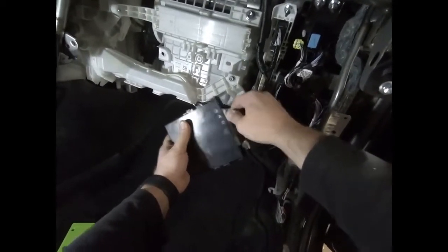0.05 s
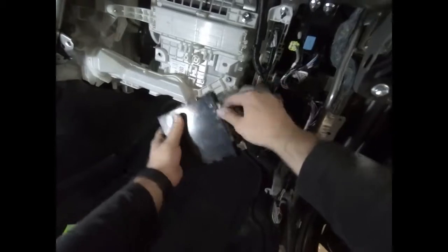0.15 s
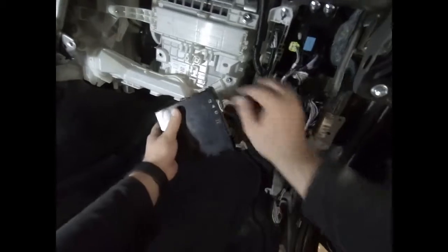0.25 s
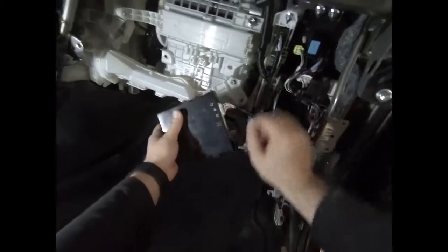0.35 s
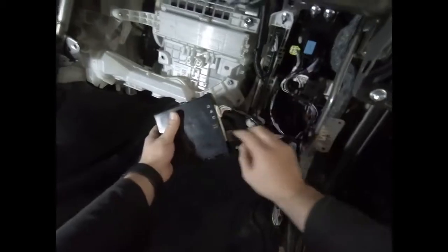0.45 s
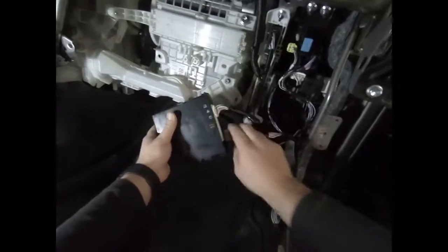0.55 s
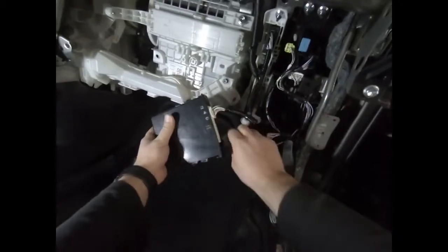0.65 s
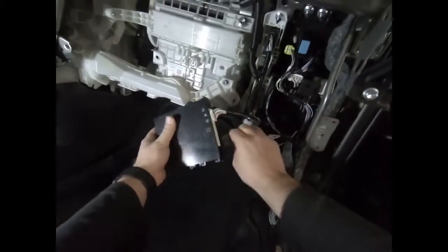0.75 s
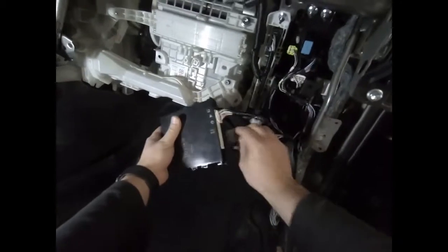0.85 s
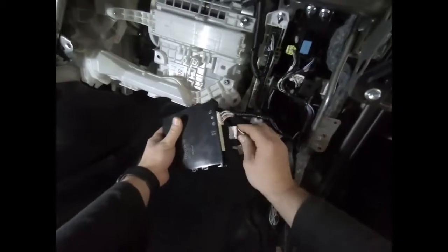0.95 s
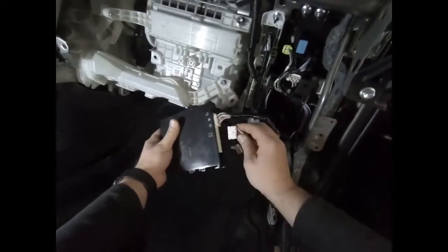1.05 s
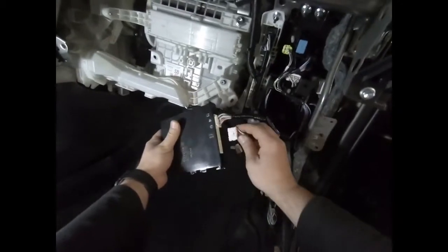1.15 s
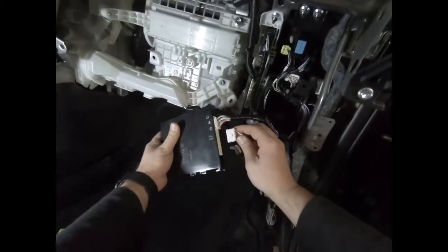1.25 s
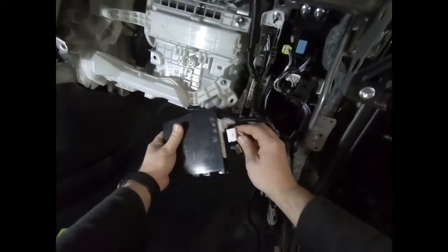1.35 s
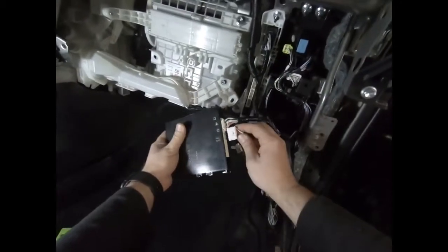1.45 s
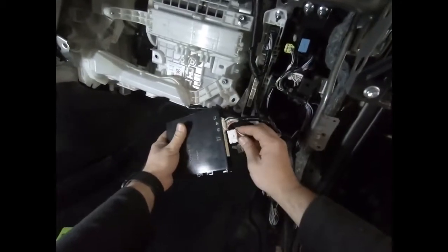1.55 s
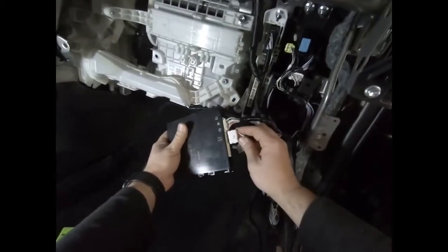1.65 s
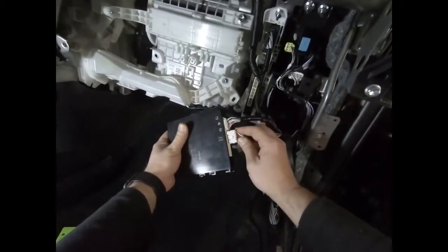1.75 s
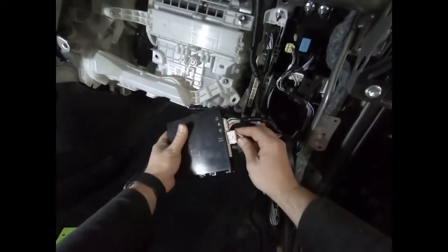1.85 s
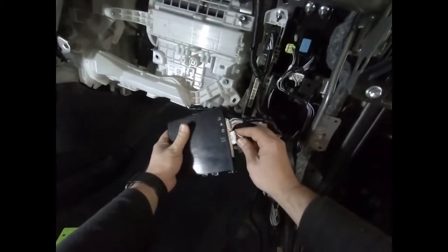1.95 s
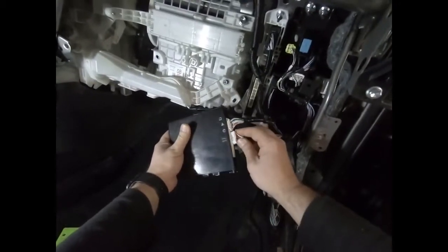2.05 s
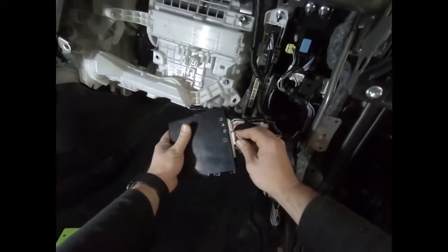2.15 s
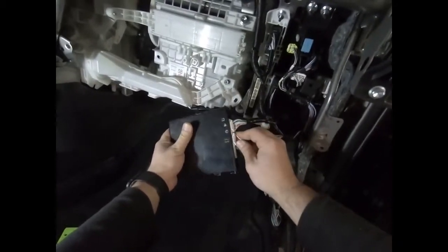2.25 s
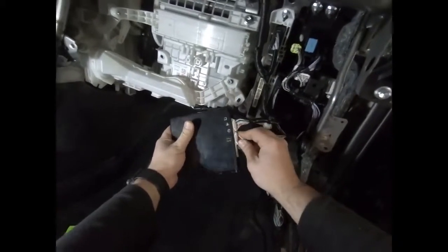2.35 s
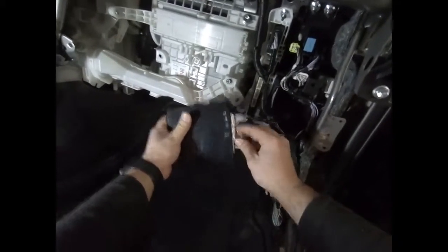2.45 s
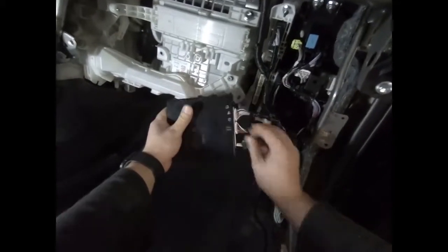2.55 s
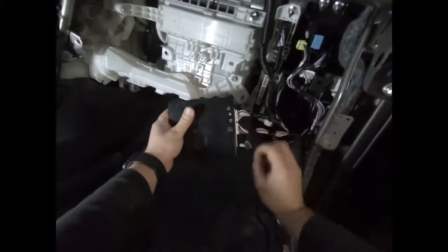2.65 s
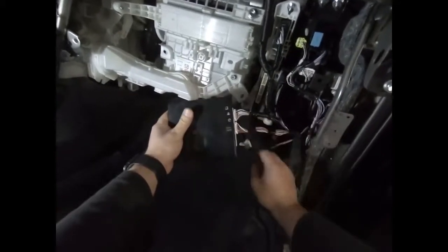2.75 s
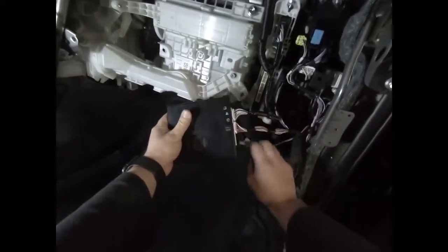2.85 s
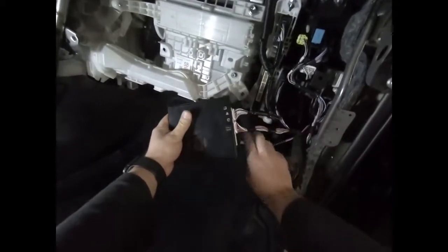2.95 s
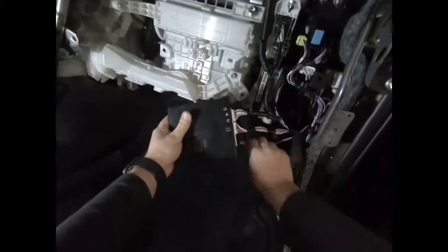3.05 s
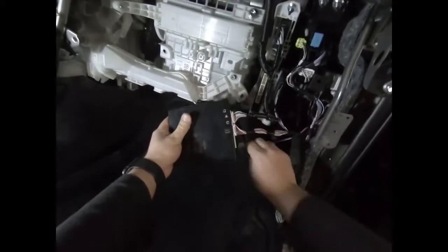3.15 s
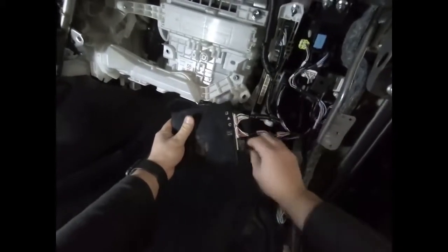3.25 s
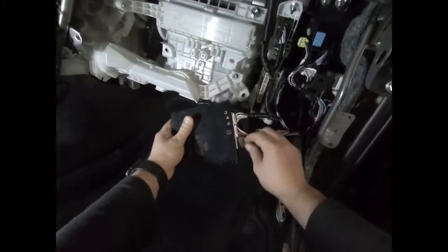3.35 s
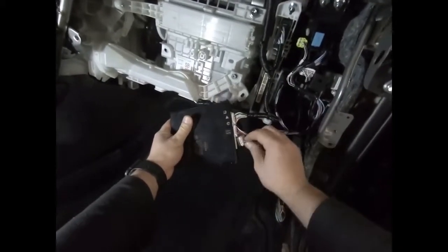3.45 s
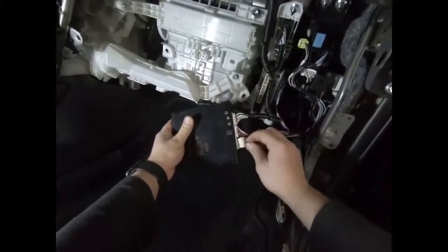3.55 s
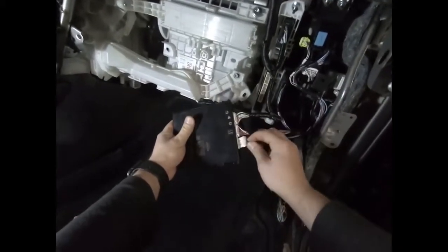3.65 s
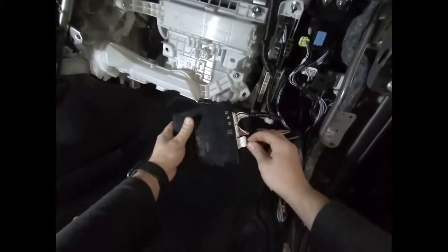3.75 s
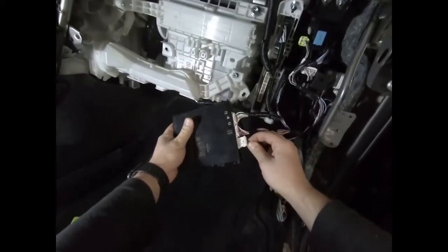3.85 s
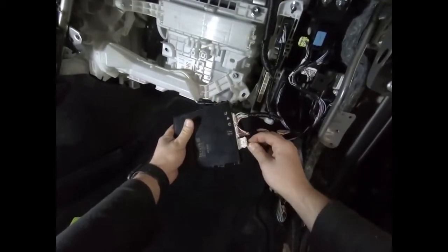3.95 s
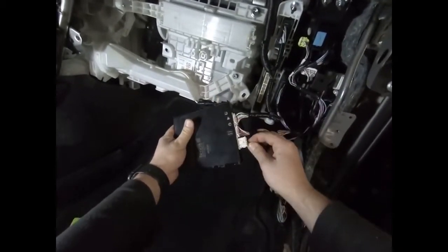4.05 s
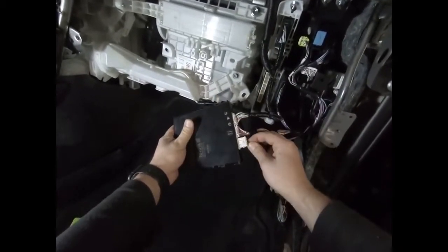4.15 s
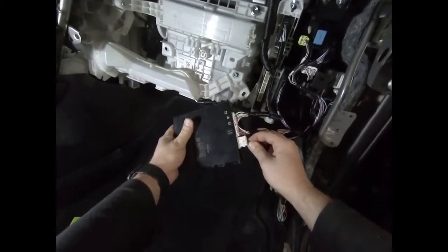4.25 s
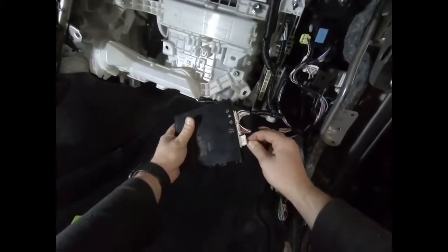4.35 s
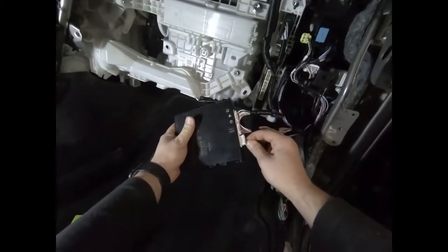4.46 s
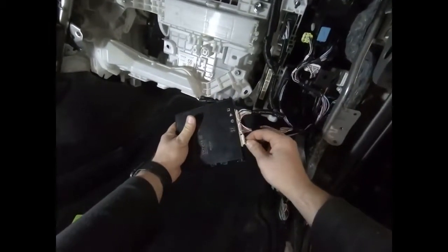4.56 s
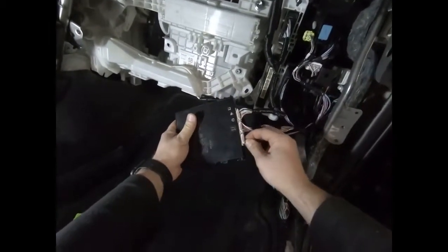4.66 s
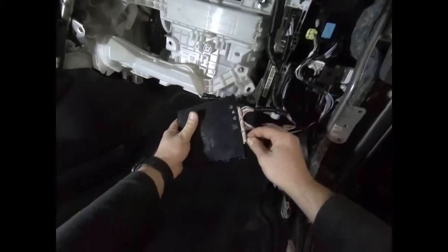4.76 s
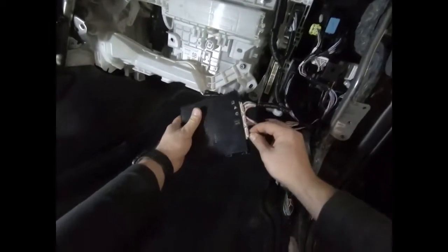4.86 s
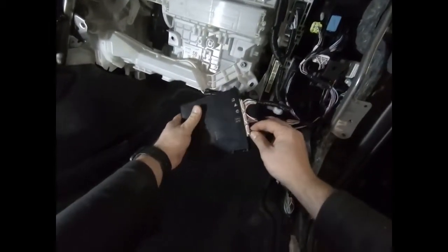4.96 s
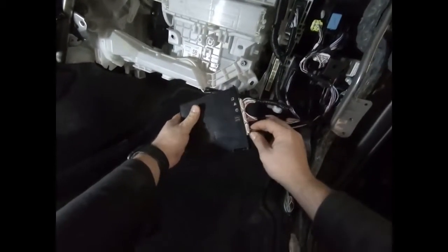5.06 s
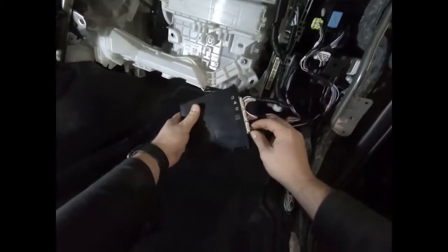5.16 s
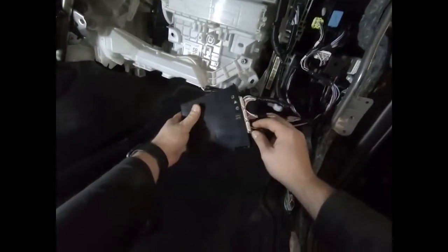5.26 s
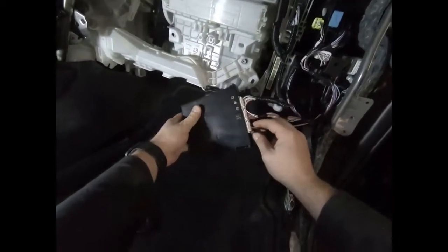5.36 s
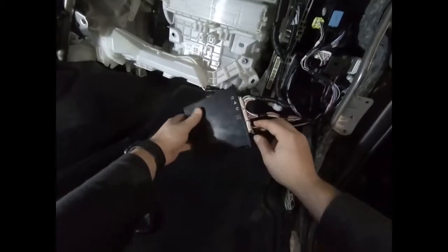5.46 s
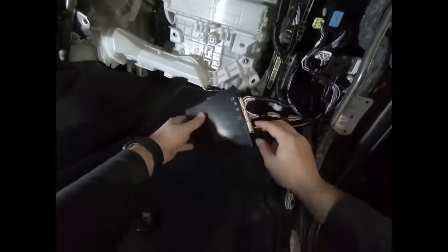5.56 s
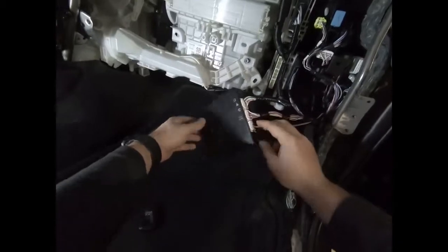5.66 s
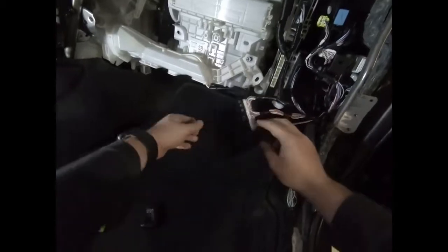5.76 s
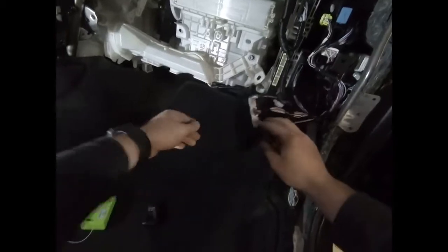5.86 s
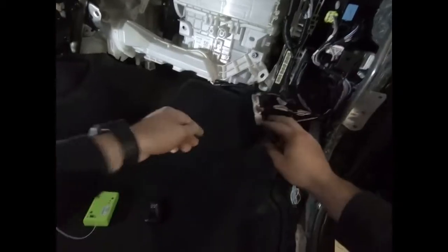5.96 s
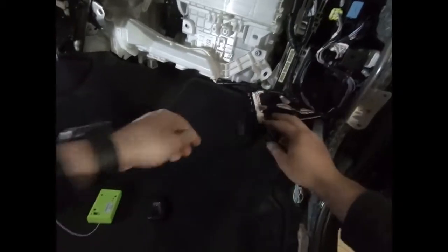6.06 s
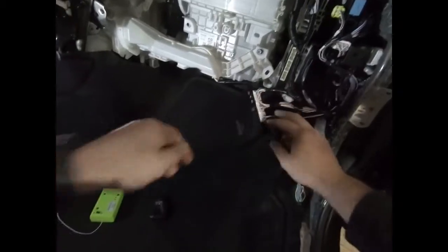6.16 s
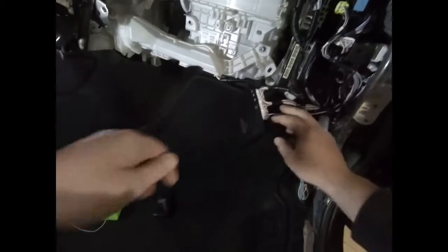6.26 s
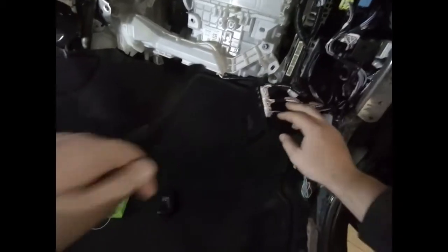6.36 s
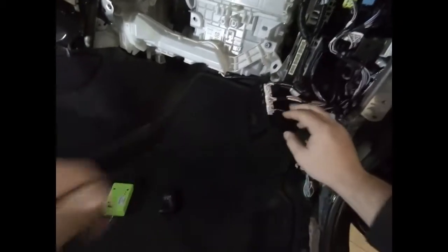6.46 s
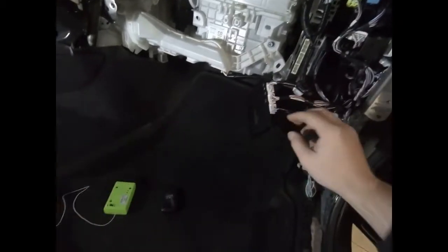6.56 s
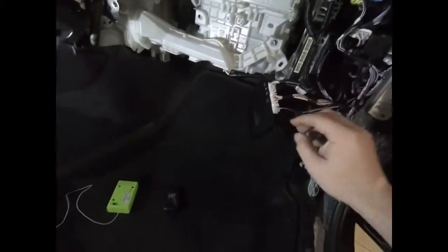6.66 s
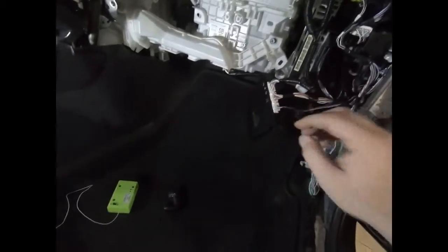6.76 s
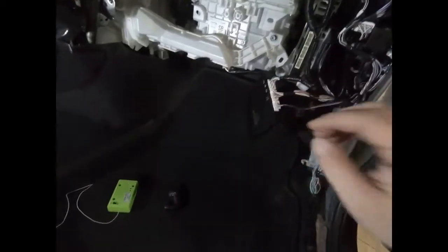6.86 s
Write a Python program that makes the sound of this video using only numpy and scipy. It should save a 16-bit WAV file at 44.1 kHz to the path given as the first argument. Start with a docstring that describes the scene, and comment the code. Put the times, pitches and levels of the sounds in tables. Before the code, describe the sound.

Right at the start a sharp plastic snap, the loudest sound, marks a wiring plug latching into a control unit under a car dashboard. Light ticks and scuffs follow, with a small click near 0.8 seconds and another around 2 seconds. A second sharp snap comes at about 2.4 seconds, then soft scuffing and rubbing of fingers and wires until nearly 3 seconds, and again around 3.5. Small ticks cluster from 4.1 to 4.4 seconds, leading to a clear, lighter snap at 4.7. From about 5.5 seconds a sleeve drags close by in several soft pulls, with dull bumps of the microphone mount from 6 seconds and one last small tick near 6.8. Each click rings only briefly in the tight hollow. The body-worn microphone hears everything close and almost in mono, over a faint low workshop hum and slight hiss.

```python
"""Under a stripped car dashboard in a quiet workshop, hands push small plastic plugs into a control unit.
Each snap or tick rings the latch, the plug's shell and the unit's case, and the hollow answers briefly.
Plugs scuff, fingers and wires rub, and at the end a sleeve drags close by. A body-worn microphone hears
it almost in mono, with soft bumps of its mount, over the workshop's hum and its own hiss."""
import sys
import numpy as np
from scipy import signal
from scipy.fft import rfft, irfft, next_fast_len
from scipy.io import wavfile
from scipy.ndimage import map_coordinates

SR = 44100
rng = np.random.default_rng(int(sys.argv[2]) if len(sys.argv) > 2 else 0)


def wav_record(signal):
    """Record a signal, one row per channel, as 16-bit PCM in the file named by sys.argv[1]."""
    frames = np.transpose(np.atleast_2d(signal))
    bounded = np.clip(frames, -1, 1)
    # unit amplitude maps onto the largest positive 16-bit level
    quanta = np.round(bounded * 32767).astype(np.int16)
    wavfile.write(sys.argv[1], SR, quanta)


N = 304171


def amp(db):
    """Decibels to gain."""
    return 10 ** (np.asarray(db) / 20)


def unit(x):
    """Scaled to rms 1."""
    return x / np.sqrt(np.mean(x ** 2) + 1e-20)


def along(points, hz):
    """Reads (Hz, value) points on a log frequency axis."""
    freqs, values = np.transpose(points)
    return np.interp(np.log(hz + 1), np.log(freqs + 1), values)


def curves(rows):
    """A fader curve for each column after the time, held at both ends."""
    times, *columns = np.transpose(rows)
    return [np.interp(np.arange(N) / SR, times, column) for column in columns]


def filtered(x, response):
    """x through a complex response of frequency."""
    size = next_fast_len(x.shape[-1] + 8192)
    return irfft(rfft(x, size) * response(np.fft.rfftfreq(size, 1 / SR)), size)[..., :x.shape[-1]]


def resonances(modes):
    """Response of (Hz, width Hz, dB) modes, summed with alternating polarity."""
    return lambda f: sum((-1) ** k * amp(db) * 1j * f * width / (hz * hz - f * f + 1j * f * width)
                         for k, (hz, width, db) in enumerate(modes))


def colour(points):
    """Response of an EQ curve through (Hz, dB) points."""
    return lambda f: amp(along(points, f))


def uneven_noise(response, flutter_db, rate_hz):
    """Coloured noise of rms 1 whose level wavers smoothly at random."""
    noise = rng.standard_normal(N)
    knots = rng.standard_normal(int(N * rate_hz / SR) + 4)
    flutter = map_coordinates(knots, [np.arange(N) * rate_hz / SR])
    return unit(filtered(noise * amp(flutter_db * flutter), response))


# The room tone's colour. Each row: frequency in Hz, relative level in dB.
HUM_EQ = [(12, -30), (20, 2.5), (43, 0.5), (111, -16.5), (136, -10), (190, -5), (251, -14.5), (408, -17.5),
          (527, -34), (716, -12), (794, -19), (1620, -23.5), (2380, -42.5), (4290, -41), (9000, -42),
          (11700, -67.5), (19800, -120)]


def workshop():
    """A low hum of air, gently wavering."""
    return amp(-71) * uneven_noise(colour(HUM_EQ), flutter_db=-2, rate_hz=3.4)


# Low thuds. Each row: start in seconds, level in dB, pitch in Hz, seconds to fall 60 dB.
BUMPS = [(0.098, -49, 61.6, 0.13), (0.955, -50.5, 78.6, 0.082), (2.698, -72, 126, 0.19),
         (3.479, -53, 85, 0.14), (5.962, -43, 149, 0.087), (6.244, -44.5, 114, 0.088),
         (6.731, -46, 84.6, 0.38)]


def mount_bumps():
    """The microphone's mount is bumped: each thud is a damped sine with a soft attack."""
    out, t = np.zeros(N + SR), np.arange(SR // 2) / SR
    attack = 1 - np.exp(-t / 0.0034)
    for start, db, hz, t60 in BUMPS:
        out[round(start * SR):][:len(t)] += amp(db - 60 * t / t60) * attack * np.sin(2 * np.pi * hz * t)
    return out[:N]


# The weave's hiss, standing for cloth speed. Each row: time in seconds, level in dB.
WEAVE_LEVELS = [(5.4, -98.5), (5.75, -80), (5.9, -79), (6.04, -71), (6.79, -68.5), (6.897, -74)]
# Pulls of the sleeve. Each row: start in seconds, length in seconds, drag level in dB.
SLEEVE_PULLS = [(5.454, 0.2, -65), (5.68, 0.14, -56.5), (5.88, .14, -58.5), (6.114, 0.14, -59.5),
                (6.361, 0.128, -58), (6.516, 0.18, -54.5), (6.704, 0.22, -54.5)]
# Colours of the low drag, mid creases and bright weave. Each row: frequency in Hz, relative level in dB.
DRAG_EQ = [(29, -34), (50, -4), (119, -9), (157, 2), (243, -3.5), (414, -0.5), (668, -11.5), (1200, -22.5),
           (1560, -42), (2640, -120)]
CREASE_EQ = [(470, -33.5), (800, -5), (860, -7), (1790, -5), (3000, -21.5), (3900, -52.5), (6600, -120)]
WEAVE_EQ = [(1880, -35), (3200, -14), (4040, -1.5), (4610, -1), (5970, -10.5), (7000, -23), (8160, -15.5),
            (10900, -33), (12600, -24.5), (15600, -29.5)]


def sleeve(rise_s=0.022, fall_s=0.04, slack_db=-8):
    """Cloth drags in a low scuff with each pull, creases crackle, the weave hisses smoothly."""
    t = np.arange(N) / SR

    def swell(start, length):
        return np.clip(np.minimum((t - start) / rise_s, 1 + (start + length - t) / fall_s), 0, 1)

    drag = np.zeros(N)
    for start, length, db in SLEEVE_PULLS:
        slack = amp(slack_db) * swell(start, length + 0.1)  # the cloth drags on a little after a pull
        drag = np.maximum(drag, amp(db) * np.maximum(swell(start, length), slack))
    hiss = amp(curves(WEAVE_LEVELS)[0]) * (t > WEAVE_LEVELS[0][0])
    crackle = np.hypot(amp(-10.5) * drag, amp(6) * hiss)
    return (drag * uneven_noise(colour(DRAG_EQ), flutter_db=2.5, rate_hz=60)
            + crackle * uneven_noise(colour(CREASE_EQ), flutter_db=2, rate_hz=140)
            + hiss * uneven_noise(colour(WEAVE_EQ), flutter_db=0.4, rate_hz=31))


# Modes of the unit's case and the plug's shell. Each row: pitch in Hz, width in Hz, relative level in dB.
CASE_MODES = [(170, 42, 2.5), (310, 230, -10)]
SHELL_MODES = [(380, 80, -5), (520, 230, -0.5), (818.5, 92, 5.5), (953, 160, -3), (1393, 310, -1.5),
               (1640, 110, 1), (1820, 520, -5), (2077, 120, -3.5)]
# Fingers and wires rubbing. Each row: time in seconds, pressing level in dB, sliding level in dB.
RUB_LEVELS = [(0.07, -66, -72.5), (0.56, -68.5, -72), (0.8, -72.5, -77), (1.9, -74, -77),
              (2.27, -67.5, -74), (2.8, -60, -72), (3.17, -76.5, -80.5), (3.41, -76, -77.5),
              (3.61, -77, -70), (3.88, -77, -81), (4.6, -75, -75), (4.84, -66.5, -76.5), (5.16, -81.5, -80)]


def fingers():
    """Pressing stirs the case, sliding the shell, over a faint, nearly steady hiss around 4.3 kHz."""
    press_db, slide_db = curves(RUB_LEVELS)
    hiss_band_db = -85.5 + 0.4 * (slide_db - slide_db.mean())
    # skin is too soft to drive the shell's treble
    dull_shell = lambda f: resonances(SHELL_MODES)(f) / (1 + (f / 2300) ** 4)
    hiss_band = lambda f: resonances([(4300, 1500, 0)])(f) ** 3
    return (amp(press_db) * uneven_noise(resonances(CASE_MODES), flutter_db=1.5, rate_hz=27)
            + amp(slide_db) * uneven_noise(dull_shell, flutter_db=2.4, rate_hz=24)
            + amp(hiss_band_db) * uneven_noise(hiss_band, flutter_db=0.34, rate_hz=29))


# The dashboard hollow's decay. Each row: frequency in Hz, seconds to fall 60 dB.
HOLLOW_DECAY = [(200, .2), (1000, 0.18), (5000, 0.13), (12000, 0.12)]


def hollow(x, wet_db=-9.5):
    """x plus a fresh short tail from the dashboard hollow, the treble dying first."""
    hz, t, spectra = signal.stft(rng.standard_normal(len(x)), SR, nperseg=128)
    decay = amp(-60 * t / along(HOLLOW_DECAY, hz)[:, None])
    tail = signal.istft(spectra * decay, SR, nperseg=128)[1]
    return x + amp(wet_db) * signal.fftconvolve(x, tail / np.linalg.norm(tail))[:len(x)]


def contact(start, decay_ms, parts, swell_db):
    """One rough push rings each (response, peak dB) part, and the hollow answers."""
    lead = SR // 20
    t = (np.arange(SR // 3) - lead) / SR
    age = np.maximum(t, 0) * 1000 / decay_ms
    pushes = np.tile(np.minimum(3 * age, 1) * np.exp(-age), (len(parts), 1))
    pushes[0] += amp(swell_db + 1800 * np.minimum(t, 0)) * (t < 0)  # the first part swells in early
    grit = amp(rng.normal(0, 2.5, len(t) // 64 + 1)).repeat(64)[:len(t)]  # surfaces catch and slip
    sound = np.zeros(len(t))
    for push, (response, peak_db) in zip(pushes, parts):
        ring = filtered(push * grit * rng.standard_normal(len(t)), response)
        sound += amp(peak_db) * ring / np.abs(signal.hilbert(ring)).max()
    return np.pad(hollow(sound), (round(start * SR), N))[lead:lead + N]


def struck(modes, pitch_hz, db_per_octave, band_hz):
    """Modes near the struck spot's pitch lead; the part radiates through one (centre, width) band."""
    weighted = [(hz, width, db - db_per_octave * abs(np.log2(hz / pitch_hz))) for hz, width, db in modes]
    return lambda f: resonances(weighted)(f) * resonances([(*band_hz, 0)])(f) ** 2


# The cracks' bright colour. Each row: frequency in Hz, relative level in dB.
CRACK_EQ = [(1500, -40.5), (2100, -8), (3200, -9.5), (5500, -19), (7000, -6.5), (8300, -2), (11200, -15.5),
            (12600, -5.5), (15600, -9)]
# Edges meeting. Each row: start in seconds, peak level in dB, decay in milliseconds.
EDGE_HITS = [(0.0175, -37.5, 3), (0.675, -60, 5.6), (0.6974, -61, 6), (0.846, -64.5, 4.8), (1.429, -63, 9),
             (2.2014, -67.5, 6), (2.3585, -39.5, 5), (4.6922, -48, 6)]


def edge_cracks():
    """Hard edges meet with a short, broad crack in the air."""
    return sum(contact(start, ms, [(colour(CRACK_EQ), db)], swell_db=-39.5)
               for start, db, ms in EDGE_HITS)


# The latch's modes. Each row: pitch in Hz, width in Hz, relative level in dB.
LATCH_MODES = [(4090, 410, 2.5), (4420, 67, -5), (4484, 200, -2), (5080, 250, -4.5), (5514, 180, -2),
               (5977, 150, -5.5), (6200, 300, -10.5)]


def latch(db):
    """Response of the plastic latch: a harder snap rings it higher."""
    pitch_hz = np.interp(db, [-60, -38.5], [4870, 5300])
    return struck(LATCH_MODES, pitch_hz, db_per_octave=31.5, band_hz=(4900, 2400))


def latch_chatter(start_s=4.107, gap_s=0.025, peak_db=-56):
    """The latch drags twice over its ramp."""
    return sum(contact(start, decay_ms=14, parts=[(latch(peak_db), peak_db)], swell_db=-16.5)
               for start in (start_s, start_s + gap_s))


# Plug scuffing on case. Each row: start in seconds, shell peak in dB, shell pitch in Hz.
PLUG_SCUFFS = [(0.207, -55.5, 718), (0.351, -53, 401), (0.516, -56.5, 407), (0.537, -58, 423),
               (1.091, -60, 794), (1.549, -60.5, 840), (2.651, -52.5, 860), (2.775, -57.5, 1640),
               (2.838, -58.5, 1800), (2.793, -54.5, 462), (2.82, -58, 401), (3.423, -58.5, 787),
               (3.453, -53, 466), (3.506, -54, 760), (3.569, -52, 725), (3.609, -62.5, 1810),
               (4.917, -58, 890), (5.465, -66.5, 397), (5.693, -60, 415)]


def scuffs():
    """A slow graze rings the shell, with the case just under it and the latch faint."""
    out = np.zeros(N)
    for start, db, hz in PLUG_SCUFFS:
        shell = struck(SHELL_MODES, hz, db_per_octave=5.5, band_hz=(1200, 2800))
        parts = [(latch(db), db - 17.5), (shell, db), (resonances(CASE_MODES), db - 2.5)]
        out += contact(start, decay_ms=14, parts=parts, swell_db=-16.5)
    return out


# Snaps and ticks. Each row: start in seconds, latch peak in dB, shell peak in dB, case peak in dB,
# shell pitch in Hz, decay of the push in milliseconds.
LATCH_SNAPS = [(0.0174, -12.5, -25.5, -41.5, 1310, 2.7), (0.0254, -32, -49.5, -39.5, 503, 2.3),
               (0.1351, -55, -65, -74, 1530, 6.2), (0.245, -52, -48.5, -69, 615, 14),
               (0.274, -58, -54.5, -60, 786, 5.8), (0.4331, -59, -55.5, -65.5, 797, 6.1),
               (0.675, -64.5, -50, -58.5, 631, 5.6), (0.6977, -69, -53.5, -58, 638, 5),
               (0.846, -46, -43, -74, 858, 4.8), (0.8924, -68, -51.5, -76.5, 786, 2.2),
               (0.9404, -59, -67, -69, 715, 3.8), (1.428, -63.5, -56.5, -61, 650, 14.6),
               (1.8342, -62.5, -51, -55.5, 789, 5.6), (2.0143, -55, -41, -48.5, 782, 6.4),
               (2.0288, -55.5, -45, -46.5, 722, 14.2), (2.2013, -60.5, -52.5, -59, 1590, 7.5),
               (2.3587, -19.5, -34.5, -48, 800, 4.6), (2.3655, -31, -32, -39, 1230, 3.6),
               (2.5494, -66, -64, -74, 710, 6.3), (2.6095, -65, -60, -64, 1500, 4.2),
               (2.7021, -58, -65, -43.5, 460, 2.8), (3.5864, -55, -53.5, -71, 705, 7.1),
               (3.6998, -65, -70, -63.5, 735, 4.4), (4.087, -53, -59, -56, 818, 12),
               (4.1597, -50.5, -51, -57.5, 754, 5), (4.3549, -66.5, -60.5, -64, 805, 5.9),
               (4.3988, -43, -43.5, -51, 819, 5.7), (4.6087, -69, -62, -72, 1570, 3.8),
               (4.6927, -32, -35, -42, 1210, 5.33), (4.7697, -71, -61, -56.5, 468, 3.2),
               (6.8243, -64.5, -48.5, -63.5, 500, 3.2)]


def snaps():
    """A latch drops home or ticks, ringing itself, the shell and the case."""
    out = np.zeros(N)
    for start, latch_db, shell_db, case_db, hz, ms in LATCH_SNAPS:
        # a hard blow wakes every shell mode, a light one only those near its spot
        db_per_octave = np.clip(-0.55 * shell_db - 16.5, 0, 30)
        shell = struck(SHELL_MODES, hz, db_per_octave, band_hz=(1000, 2600))
        parts = [(latch(latch_db), latch_db), (shell, shell_db), (resonances(CASE_MODES), case_db)]
        out += contact(start, ms, parts, swell_db=-10)
    return out


# A stereo EQ on the clicks. Each row: frequency in Hz, left over right in dB.
TREBLE_TILT = [(3000, 0), (8000, 0.5), (12000, 8)]


def scene():
    """A stereo EQ makes the clicks' top treble louder on the left; all else sits in the centre."""
    clicks = snaps() + scuffs() + latch_chatter() + edge_cracks()
    tilted = filtered(clicks, lambda f: amp(np.outer([0.5, -0.5], along(TREBLE_TILT, f))))
    return tilted + fingers() + mount_bumps() + sleeve() + workshop()


# The microphone's hiss. Each row: frequency in Hz, relative level in dB.
HISS_EQ = [(2000, -16), (5000, -18), (6500, -9), (11200, -3), (12600, 2.5), (15700, -4.5)]
TOP_HZ = 15750


def record(dry):
    """Each channel adds its own hiss; nothing passes above the band limit."""
    hiss = amp(-89) * unit(filtered(rng.standard_normal((2, N)), colour([(300, -69)] + HISS_EQ)))
    return filtered(dry + hiss, lambda hz: hz < TOP_HZ)


dry = scene()
out = record(dry)
wav_record(out)
```